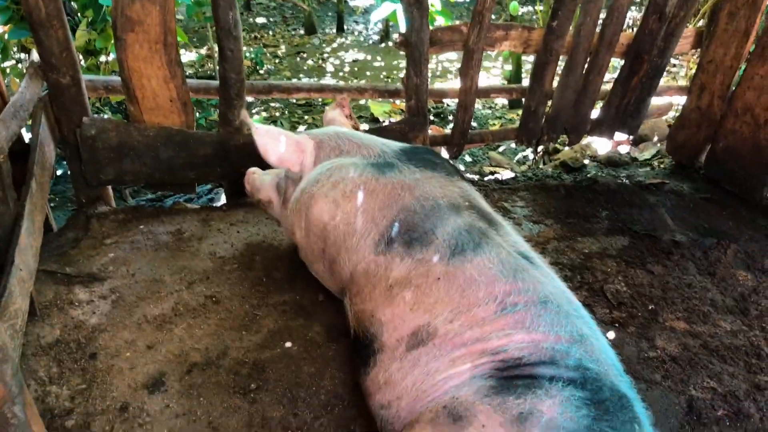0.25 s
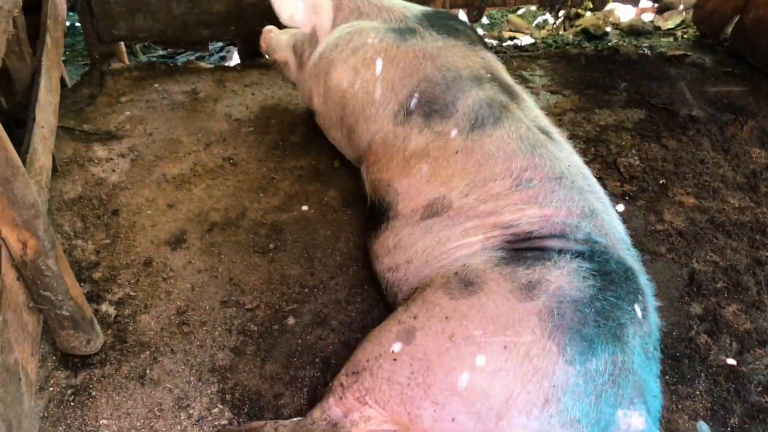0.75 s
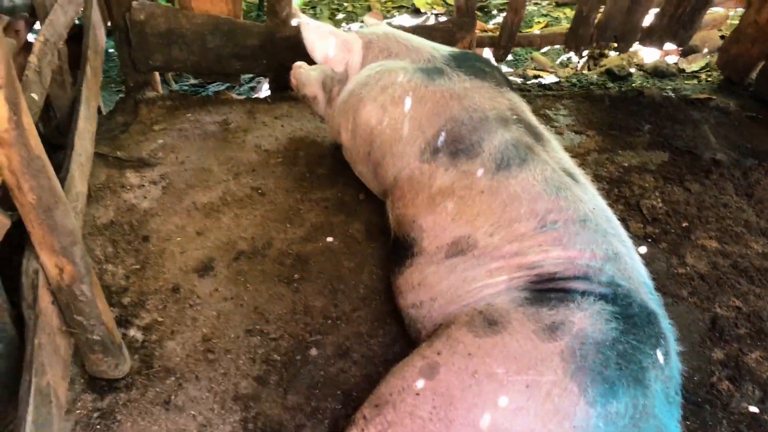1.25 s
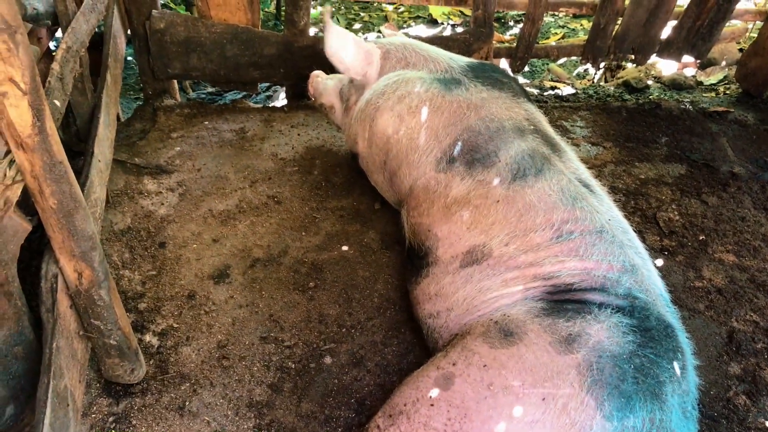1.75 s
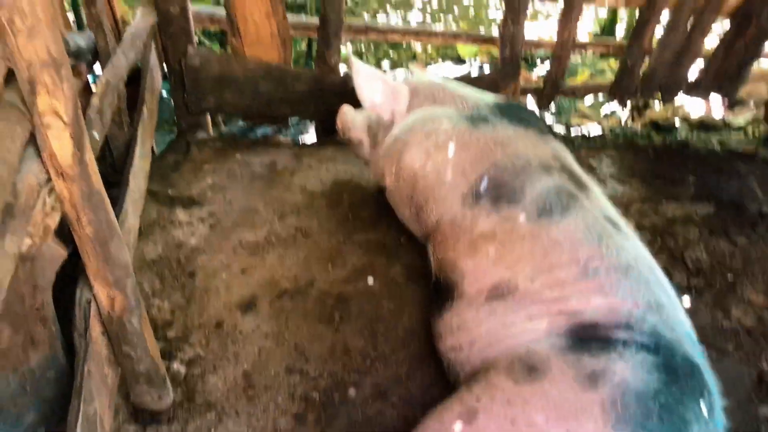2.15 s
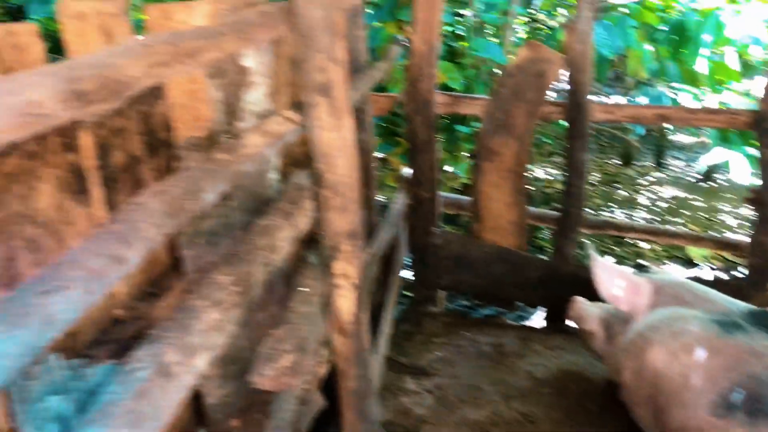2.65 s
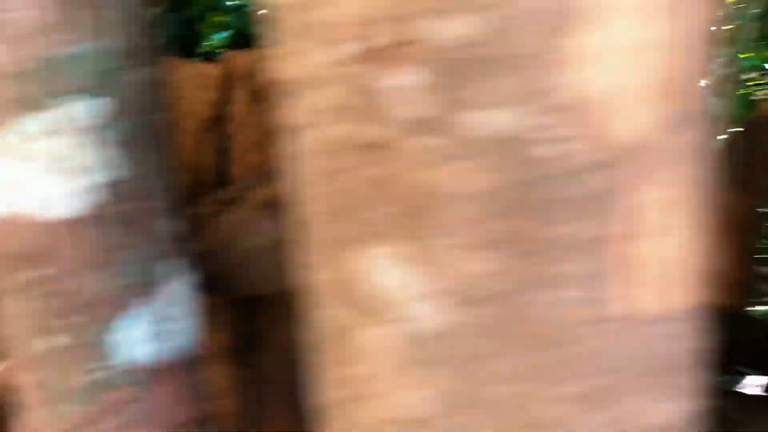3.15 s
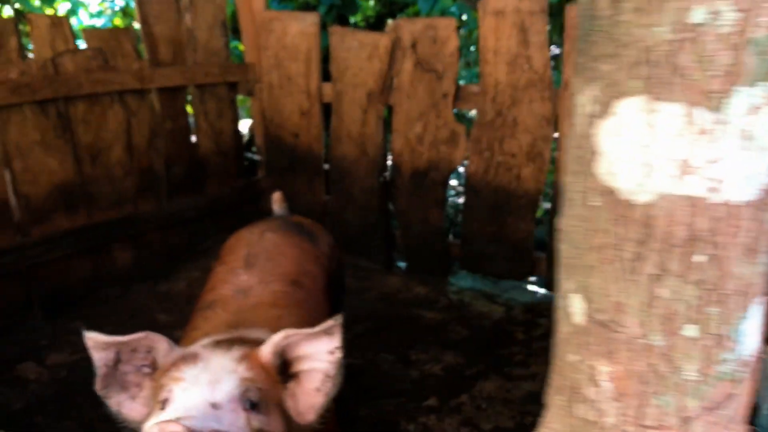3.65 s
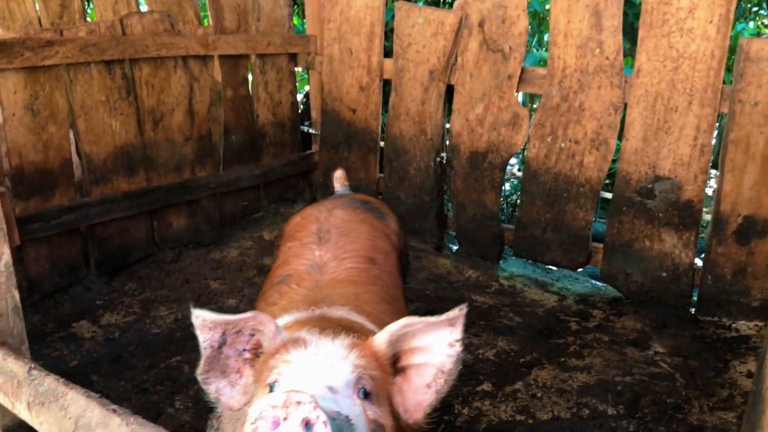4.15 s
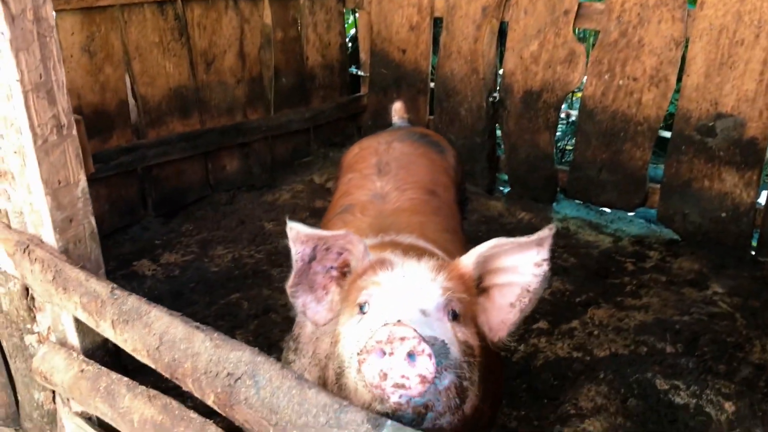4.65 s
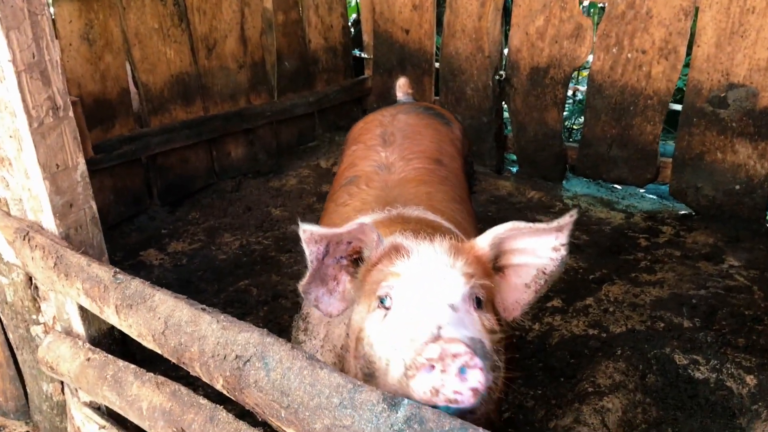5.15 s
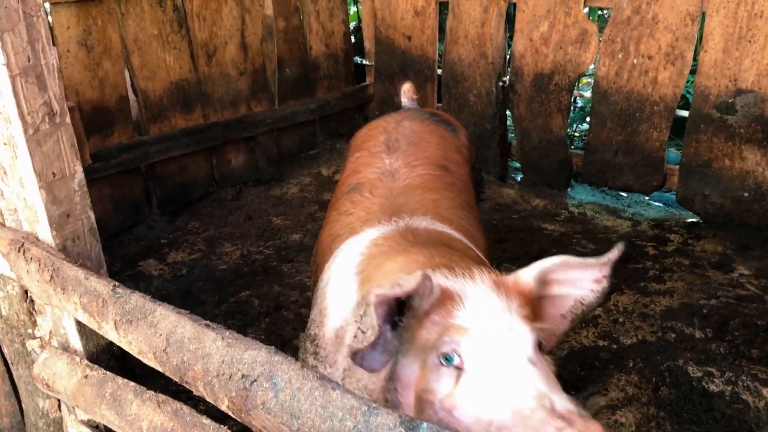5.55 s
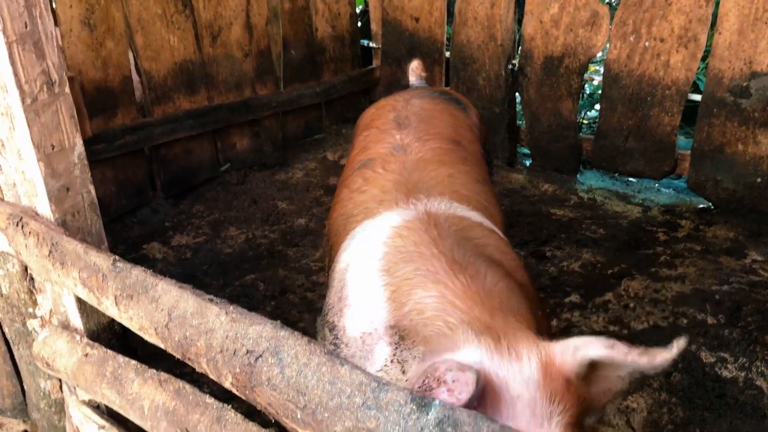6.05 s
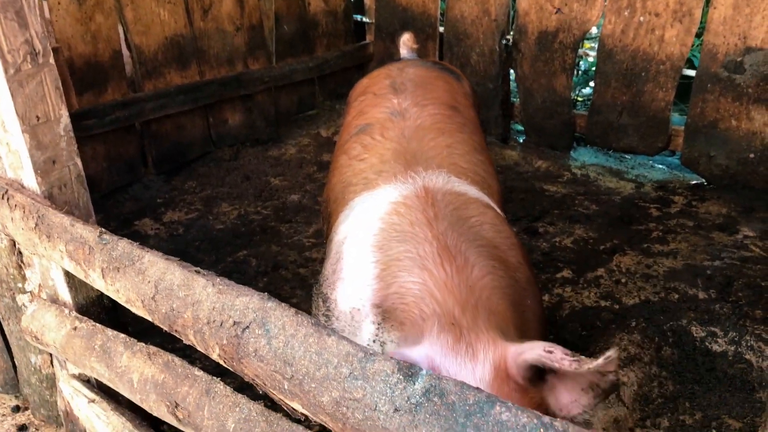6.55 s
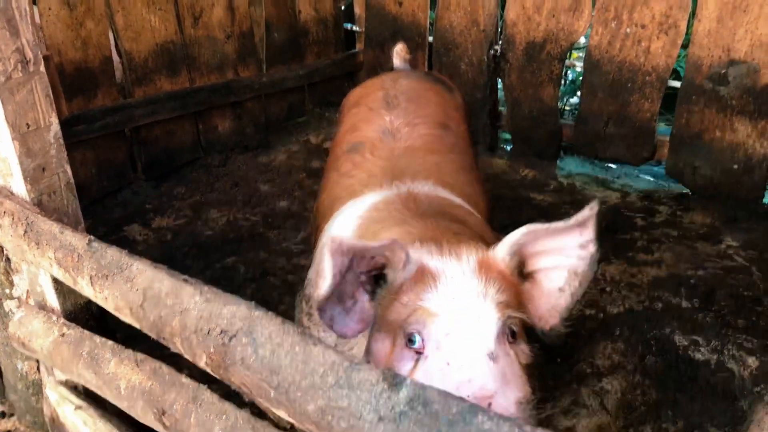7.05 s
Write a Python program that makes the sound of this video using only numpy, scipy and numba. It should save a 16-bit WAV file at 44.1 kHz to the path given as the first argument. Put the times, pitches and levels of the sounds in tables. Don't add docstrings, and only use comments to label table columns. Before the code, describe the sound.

Deep rasping pig grunts with a faint far bird, two hard wooden knocks, wet snorts and smacks, then brighter close grunts outdoors.

```python
import sys
import numpy as np
from scipy import signal
from scipy.fft import rfft, irfft
from scipy.io import wavfile
from scipy.ndimage import uniform_filter1d
from numba import njit

SR = 44100
rng = np.random.default_rng(int(sys.argv[2]) if len(sys.argv) > 2 else 0)


def magnitude_from_level(level_db):
    exponent = np.asarray(level_db, float) / 20
    return 10 ** exponent


def wav_record(signal):
    frames = np.transpose(np.atleast_2d(signal))
    bounded = np.clip(frames, -1, 1)
    quanta = np.round(bounded * 32767).astype(np.int16)
    wavfile.write(sys.argv[1], SR, quanta)


N = 322371


def rms_one(x):
    return x / np.sqrt(np.mean(x ** 2) + 1e-20)


def filtered(x, order, hz, kind="low"):
    return signal.sosfilt(signal.butter(order, hz, kind, fs=SR, output="sos"), x)


def coloured_noise(spectrum):
    hz, level_db = np.transpose(spectrum)
    grid = np.linspace(1, SR / 2, 1025)
    log_level = np.interp(np.log(grid), np.log(hz), level_db) * np.log(10) / 20
    cepstrum = irfft(log_level)
    cepstrum[1:1024] *= 2
    cepstrum[1025:] = 0
    colour = irfft(np.exp(rfft(cepstrum)))
    return rms_one(signal.fftconvolve(rng.standard_normal(N), colour)[:N])


def drift(rate_hz):
    knots = rng.standard_normal(int(N / SR * 60) + 2)
    smooth = signal.lfilter([1], [1, -np.exp(-2 * np.pi * rate_hz / 60)], knots)
    return rms_one(np.interp(np.arange(N) / SR * 60, np.arange(len(knots)), smooth))


def dying(clicks, t60):
    return signal.lfilter([1], [1, -magnitude_from_level(-60 / (t60 * SR))], clicks + 1e-18)


def swells(rows, t, squareness):
    s, rise, fall = np.transpose(rows)[:3, :, None]
    edge_db = 29
    return -edge_db * np.abs((t - s) / np.where(t < s, rise, fall)) ** squareness


@njit
def resonate(x, turn, r):
    y = np.zeros(len(x))
    for i in range(2, len(x)):
        y[i] = (1 - r * r) / 2 * (x[i] - x[i - 2]) + 2 * r * np.cos(turn[i]) * y[i - 1] - r * r * y[i - 2]
    return y


# pitch_hz, level_db (per Hz)
LEAF_COLOUR = [(59, -37), (100, 2), (150, -12), (266, -22), (389, -3), (595, 1.5), (950, -5.5), (1450, -8),
               (3400, -6.5), (4870, -17.5), (5190, -10.5), (6990, -5), (10500, -53), (14400, -11),
               (16000, -25)]
# time_s, level_db
WIND_STRENGTH = [(0.0, -52), (.4, -50), (1.2, -56), (2.2, -54), (3.0, -61), (3.4, -62), (3.7, -54),
                 (4.2, -52), (4.7, -57.5), (5.3, -60), (5.9, -55), (7.31, -55)]
# peak_s, rise_s, fall_s, level_db
FAR_PIGS = [
    (.64, 0.036, 0.08, -51.5),
    (1.45, 0.14, 0.087, -53.5),
    (1.75, 0.1, 0.21, -53.5),
    (3.6, 0.23, 0.27, -55.5),
    (4.1, 0.23, 0.6, -64),
    (4.93, 0.18, 0.094, -49),
    (5.18, 0.1, 0.11, -53),
    (5.93, 0.13, 0.18, -50.5),
]


def outdoors(t):
    leaves = magnitude_from_level(-60.5 + 1.3 * drift(0.56)) * coloured_noise(LEAF_COLOUR)
    wind_s, wind_db = np.transpose(WIND_STRENGTH)
    rumble_db = np.minimum(np.interp(t, wind_s, wind_db), -49)
    rumble = rms_one(filtered(rng.standard_normal(N), 2, [40, 140], "band"))
    rumble = rumble * magnitude_from_level(rumble_db + 2.4 * drift(4.2))
    peaks = magnitude_from_level(np.array(FAR_PIGS)[:, 3])
    far_gain = np.interp(t, t[::64], peaks @ magnitude_from_level(swells(FAR_PIGS, t[::64], 2)))
    murmur = rms_one(filtered(rng.standard_normal(N), 2, [170, 320], "band"))
    murmur = murmur * (far_gain + magnitude_from_level(-68)) * magnitude_from_level(2.4 * drift(9.8))
    return leaves + rumble + murmur


# start_s, length_s, start_hz, end_hz, level_db
BIRD_CHIRPS = [(0, 0.1, 4150, 4000, -75), (0.05, 0.081, 3400, 3190, -72.5), (.51, 0.14, 3050, 2994, -73),
               (.63, 0.25, 2900, 2780, -67), (1.065, 0.066, 3250, 2950, -73),
               (2.07, 0.049, 4300, 3900, -69), (1.12, 0.06, 2620, 2400, -69.5),
               (1.308, 0.083, 2750, 2500, -65.5), (1.88, 0.04, 2450, 2350, -72),
               (1.946, 0.03, 4080, 4020, -74), (1.965, 0.035, 3370, 3290, -64),
               (2.048, 0.03, 2680, 2700, -69), (2.168, 0.083, 3600, 3250, -72),
               (2.314, 0.081, 3600, 3380, -69), (2.468, 0.068, 3600, 3370, -75),
               (2.97, 0.11, 3300, 3126, -68.5), (3.118, 0.036, 2800, 2750, -68.5),
               (3.143, 0.08, 3730, 3340, -69.5), (3.29, 0.059, 3700, 3300, -65),
               (3.43, 0.021, 4420, 4350, -69), (5.27, 0.17, 3300, 3110, -74)]
# start_s, length_s, start_hz, end_hz, level_db
NOSE_WHINES = [
    (.635, 0.034, 960, 950, -65),
    (.64, 0.046, 1960, 1700, -71),
    (6.187, 0.037, 1400, 1380, -49.5),
    (2.322, 0.038, 650, 680, -56),
]


def whistles():
    out = np.zeros(N)
    husk = rms_one(signal.lfilter([1], [1, -.985], rng.standard_normal(N)))
    for s, length, start_hz, end_hz, level_db in BIRD_CHIRPS + NOSE_WHINES:
        u = np.linspace(0, 1, round(length * SR))
        hz = end_hz + (start_hz - end_hz) * (1 - u) ** 2
        hz = hz + 40 * np.sin(2 * np.pi * 90 * u * length)
        swell = np.sqrt(np.sin(np.pi * u) + 1e-9)
        whistle = swell * np.sin(2 * np.pi * np.cumsum(hz) / SR)
        out[round(max(s, 0) * SR):][:len(u)] += magnitude_from_level(level_db + 5.5) * whistle
    return out * magnitude_from_level(5.5) * (1 + 0.65 * husk)


# peak_s, rise_s, fall_s, level_db
STRAW_SCUFFS = [
    (3.595, .08, 0.078, -55),
    (6.36, .05, .1, -62),
    (5.05, .1, .1, -60),
]


def straw(t):
    gain = magnitude_from_level(np.array(STRAW_SCUFFS)[:, 3]) @ magnitude_from_level(swells(STRAW_SCUFFS, t, 3))
    return gain * rms_one(filtered(rng.standard_normal(N), 2, 10000, "high"))


# start_s, peak_db, pitch_hz
SMACKS = [(0.4304, -55, 2950), (3.4411, -53, 4400), (3.8165, -56, 14500), (3.872, -43.5, 8840),
          (4.1587, -44, 6300), (4.446, -50, 13200), (4.4965, -41, 4510), (4.572, -34, 3190),
          (4.8442, -33.5, 3400), (5.0805, -40, 6800), (5.564, -31, 3160), (4.52, -25, 2900),
          (3.617, -48, 1200), (5.793, -52, 3100), (6.373, -36, 3500)]
# start_s, peak_db, pitch_hz, t60_s
WET_PUFFS = [
    (5.382, -44, 2500, .06),
    (5.463, -48, 4300, .05),
    (5.5, -52, 4500, .04),
    (6.63, -35.5, 3900, .04),
    (7.29, -42, 2100, .05),
]


def smacks_and_puffs():
    out, t = np.zeros(N), np.arange(600) / SR
    for s, peak_db, hz in SMACKS:
        noise = rng.standard_normal(600) * magnitude_from_level(-60 * t / 0.008)
        tick = resonate(noise, 2 * np.pi * hz / SR + 0 * t, 0.57)
        out[round(s * SR):][:600] += magnitude_from_level(peak_db + 5.5) * tick / np.abs(tick).max()
    for s, peak_db, hz, t60 in WET_PUFFS:
        noise = rng.standard_normal(600) * magnitude_from_level(-60 * t / t60) * np.hanning(600) ** .3
        puff = resonate(noise, 2 * np.pi * hz / SR + 0 * t, 0.92)
        out[round(s * SR):][:600] += magnitude_from_level(peak_db) * puff / np.abs(puff).max()
    return out


# start_s, crack_db, wood_db, wood_pitch_hz, upper_modes_db
PLANK_BLOWS = [
    (2.7719, -37, -24.5, 383, -15),
    (2.7804, -8, -14, 355.7, -0.5),
    (3.616, -44, -46, 280, 3),
    (3.7393, -64, -37, 341.4, -5),
    (3.9504, 3.5, -15, 336.5, -10.5),
    (4.5192, -19.5, -55, 430, -29),
]
# pitch_ratio, level_db, t60_s
PLANK_MODES = [(1.04, -6, 0.33), (0.974, 11, 0.089), (0.53, -22, 0.045), (1.56, -13, 0.027),
               (1.48, 1, 0.14), (2.28, -7, 0.052), (3, -12.5, 0.13), (3.7, -1, 0.042)]
# pitch_hz, level_db (per Hz)
CRACK_COLOUR = [(350, -61), (600, 6.5), (1450, -23), (1970, -6.5), (3700, 2), (5160, -11.5), (6360, -4.5),
                (7730, -10), (12800, -11.5), (15100, -7), (16200, -18), (16900, -67)]
# pitch_hz, level_db (per Hz)
RATTLE_COLOUR = [(300, -19), (700, -6.5), (2000, -4), (3500, -1.5), (6000, -6), (10000, 0.5), (15000, -4.5),
                 (16900, -58)]


def knocks():
    wood, t = np.zeros(N), np.arange(SR // 2) / SR
    cracks = np.zeros((2, N))
    onset = np.minimum(t / 0.00062, 1)
    for s, crack_db, wood_db, wood_hz, upper_db in PLANK_BLOWS:
        at = round(s * SR)
        fleshy_blow = int(crack_db - wood_db < 12)
        cracks[fleshy_blow, at] = magnitude_from_level(crack_db)
        for ratio, level_db, t60 in PLANK_MODES:
            upper = t60 > .04 and ratio > 1.2
            mode_db = wood_db + level_db + upper_db * upper - 8 - 60 * t / t60
            wood[at:at + len(t)] += magnitude_from_level(mode_db) * np.sin(2 * np.pi * wood_hz * ratio * t) * onset
    wood = filtered(wood, 2, 220, "high")
    burst = signal.fftconvolve(cracks, np.hanning(round(0.0042 * SR))[None])[:, :N]
    tail = magnitude_from_level(-11.5) * dying(cracks, t60=0.035) + magnitude_from_level(-21.5) * dying(cracks, t60=0.18)
    hard, fleshy = (magnitude_from_level(-7.5) * burst * coloured_noise(CRACK_COLOUR)
                    + magnitude_from_level(-12) * tail * coloured_noise(RATTLE_COLOUR))
    return wood + hard + filtered(fleshy, 2, 10500)


# peak_s, rise_s, fall_s, hiss_db, puff_db
SOFT_SNIFFS = [(.256, 0.22, 1, -69.5, -65.5), (1.04, 0.23, 0.065, -62, -66), (1.82, 0.1, 0.13, -63, -64),
               (2.42, 0.094, 0.23, -64.5, -66), (2.92, 0.35, 0.19, -71, -57),
               (4.859, 0.03, 0.076, -55, -49.5), (5.2, .06, 0.11, -69, -68), (5.68, 0.34, 0.13, -56.5, -51),
               (5.95, 0.1, 0.085, -66, -69), (6.15, 0.12, 0.13, -57, -54), (6.41, 0.14, 0.22, -59, -51.5),
               (6.7, 0.17, 0.15, -60, -64), (7.18, 0.043, 0.091, -67, -65)]
# peak_s, rise_s, fall_s, hiss_db, puff_db
SNORTS = [
    (1.44, 0.11, 0.16, -58, -49.5),
    (3.36, 0.17, 0.21, -67, -65),
    (3.614, 0.069, .07, -65, -54),
    (4.15, 0.29, 0.19, -64.5, -63),
    (4.55, 0.093, 0.12, -49.5, -53.5),
    (5.05, 0.21, .12, -55, -57),
    (6.88, 0.11, 0.13, -48.5, -46),
]
# pitch_hz, level_db (per Hz)
HISS_COLOUR = [(880, -38), (1500, -7.5), (2210, -5.5), (3350, -1.5), (6560, -5), (7610, -10.5), (8570, -7),
               (10600, -11.5), (14900, -5.5), (16000, -29)]
# pitch_hz, level_db (per Hz)
PUFF_COLOUR = [(180, -55), (300, 1.5), (404, -4), (441, 1), (764, 1), (1390, -5), (3000, -26), (3900, -37),
               (6600, -120)]


def sniffs(t):
    rows = np.array(SOFT_SNIFFS + SNORTS)
    coarse_t = t[::64]
    shape = magnitude_from_level(np.vstack([swells(SOFT_SNIFFS, coarse_t, 2), swells(SNORTS, coarse_t, 3.5)]))
    hiss_gain = np.interp(t, coarse_t, magnitude_from_level(rows[:, 3]) @ shape) + magnitude_from_level(-69.5)
    puff_gain = np.interp(t, coarse_t, magnitude_from_level(rows[:, 4]) @ shape) + magnitude_from_level(-65.5)
    hiss = coloured_noise(HISS_COLOUR) * hiss_gain * magnitude_from_level(3.5 + 1.73 * drift(46))
    return hiss + coloured_noise(PUFF_COLOUR) * puff_gain * magnitude_from_level(2.2 * drift(45))


def pen(x):
    lag = np.arange(SR // 4) / SR
    scatter = rng.standard_normal(len(lag)) * magnitude_from_level(-60 * lag / .2) * (lag > .004)
    scatter = signal.lfilter([.5], [1, -.5], scatter)
    return x + magnitude_from_level(-12) * signal.fftconvolve(x, scatter / np.linalg.norm(scatter))[:N]


LEAD_S, TAIL_S = .07, .12


def clap_times(start, gaps, first_ms, settled_ms):
    k = np.arange(gaps)
    gap_ms = settled_ms + (first_ms - settled_ms) * .6 ** k + .25 * k
    return start + np.append(0, np.cumsum(gap_ms)) / 1000


def effort_db(t, times, effort):
    peak, chest_db, snout_db, swell, fade = effort
    before = swell * np.maximum(peak - t, 0)
    after = fade * np.maximum(t - peak, 0)
    ends = 302 * np.maximum(times[0] - t, 0) + 23 * np.maximum(t - times[-1], 0)
    ends = ends + 30 * np.clip(1 - (times[-1] + TAIL_S - t) / .015, 0, 1)
    return chest_db - 0.74 * before - 0.46 * after - ends, snout_db - before - after - ends


def vocal_folds(t, times, claps, rasp, voiced):
    slap_noise, air_noise = rng.standard_normal((2, len(t)))
    slap = rms_one(dying(claps, t60=0.023) * slap_noise)
    air = rms_one((dying(claps, t60=.06) + .25) * air_noise)
    beat = uniform_filter1d(np.interp(t, times, np.arange(len(times))), SR // 40)
    beat = beat + np.interp(t, times, rng.normal(0, .025, len(times)))
    hum = np.zeros(len(t))
    for k in range(1, 20):
        hum += (1 - 0.63 * (k % 2)) * np.sin(2 * np.pi * (k * beat + rng.random()))
    hum = hum * np.sqrt(2 * np.mean(np.diff(times))) * (t > times[0])
    pulses = rms_one(claps)
    chest = (1 - voiced) * pulses + 0.53 * voiced * hum + 1.34 * rasp * (1 - voiced) * air
    snout = (1 - rasp) * (0.46 * pulses + slap) * (1 - .5 * voiced) + rasp * air + 0.21 * voiced * hum
    return chest, snout


# pitch_hz, width_hz, level_db
BIG_PIG_THROATS = [
    [(195, 59, 0), (449.7, 58, -4.5), (913, 76, -11.5), (1680, 120, -7.5), (2790, 98, -20),
     (3300, 120, -14), (4100, 66, -20), (4400, 60, -22), (1910, 270, -14.5), (5420, 360, -24),
     (640, 150, -8), (1280, 250, -11)],
    [(80, 23, 1), (236, 33, 11), (656, 140, -13.5), (1136, 73, -6.5), (2100, 45, -13.5), (2840, 61, -12.5),
     (3250, 23, -18.5), (4150, 45, -34), (4470, 39, -27), (1620, 590, -17), (2500, 500, -16),
     (480, 120, -10)],
    [(80.6, 25, 1.5), (222.7, 30, 8), (420, 95, -4.5), (579, 19, -1.5), (730, 49, -7), (1095, 82, -6.5),
     (1880, 60, -8.5), (2885, 110, -12.5), (3960, 90, -24), (4550, 90, -26), (2400, 900, -27),
     (3500, 200, -31)],
    [(208, 41, 6), (378, 124, 1), (513, 130, -6), (874, 56, -5), (1850, 230, -18)],
]
# pitch_hz, width_hz, level_db
YOUNG_PIG_THROATS = [
    [(200, 28, -2), (686, 26, 9), (1273, 89, -6.5), (2020, 175, -8), (3020, 71, -5), (3700, 33, -16),
     (3900, 57, -18), (4530, 99, -10.5), (6050, 180, -21.5)],
    [(169, 44, 0), (576, 69, 2), (1470, 280, -7.5), (1970, 53, -5.5), (3050, 350, -9), (3540, 100, -5),
     (4150, 350, -9), (4570, 99, -12.5), (5860, 190, -20)],
    [(194, 27, -4), (620, 30, 12), (1400, 41, -8.5), (1610, 26, -7.5), (2450, 47, -13), (2800, 240, -12),
     (3580, 106, -3.5), (5250, 79, -23)],
    [(175, 25, 0), (583, 40, 14), (1112, 190, 5), (1650, 41, 8), (1780, 25, -4), (2860, 190, 2),
     (3560, 85, 5.5), (4000, 170, -2.5), (4020, 33, 7.5), (7160, 700, -11), (9100, 570, -17)],
    [(179, 28, 0), (594, 35, 15), (1120, 150, 8.5), (1500, 140, 5.5), (1907, 60, 2.5), (2900, 130, 4.5),
     (3600, 220, 3), (4300, 180, 0.5), (7140, 580, -15.5)],
]
# pitch_hz, width_hz
SIDE_CAVITIES = [
    [],
    [(3900, 400)],
    [(1450, 230)],
    [],
    [(3850, 190)],
    [(2330, 310), (5000, 400)],
    [(1950, 250), (4400, 430)],
    [(2100, 450), (4850, 300)],
    [(2250, 310), (4950, 300)],
]


def throat(t, claps, sources, shape, rise, voiced, mouth_hz):
    chest_top_hz = 450
    chest_source, snout_source = sources
    chest, snout = np.zeros((2, len(t)))
    opening = dying(claps, t60=0.028)
    stretch = rise * np.tanh(2.4 * np.linspace(-1, 1, len(t))) / 2
    for k, (hz, width, level_db) in enumerate((BIG_PIG_THROATS + YOUNG_PIG_THROATS)[shape]):
        wobble = np.interp(t, np.linspace(t[0], t[-1], 12), rng.normal(0, 0.039, 12))
        wobble = wobble * (hz > chest_top_hz) * (1 - voiced)
        mouth_share = 0.25 + .8 * np.exp(-(np.log(hz / mouth_hz) / .4) ** 2)
        dip = (0.035 + 0.067 * (hz > 3200)) * (1 - voiced) * opening
        glide = 1 + stretch * mouth_share + wobble - dip
        source, part = (chest_source, chest) if hz < chest_top_hz else (snout_source, snout)
        r = np.exp(-np.pi * max(width, 20, 0.037 * hz) / SR)
        part += (-1) ** k * magnitude_from_level(level_db) * resonate(source, 2 * np.pi * hz * glide / SR, r)
    snout = filtered(snout, 4, 8500)
    for hz, width in SIDE_CAVITIES[shape]:
        turn = 2 * np.pi * hz * (1 + stretch / 2) / SR
        snout = snout - .9 * resonate(snout, turn, np.exp(-np.pi * width / SR))
    return rms_one(filtered(chest, 2, 1500)), rms_one(snout)


def grunt(beat, effort, manner):
    shape, rasp, rise, voiced, mouth_hz = manner
    rasp, voiced = np.clip([rasp, voiced], 0, 1)
    times = clap_times(*beat)
    first = round((times[0] - LEAD_S) * SR)
    last = min(round((times[-1] + TAIL_S) * SR), N)
    t = np.arange(first, last) / SR
    claps = np.zeros(len(t))
    claps[(times * SR).astype(int) - first] = magnitude_from_level(rng.normal(0, .7, len(times)))
    sources = vocal_folds(t, times, claps, rasp, voiced)
    chest, snout = throat(t, claps, sources, round(shape), rise, voiced, mouth_hz)
    belly = rms_one(resonate(claps, 2 * np.pi * 58 / SR + 0 * t, np.exp(-np.pi * 30 / SR)))
    chest_db, snout_db = effort_db(t, times, effort)
    snout_db = snout_db - 27 * voiced ** 4 * (t < times[1] - .002)
    out = np.zeros(N)
    out[first:last] = magnitude_from_level(chest_db) * (chest + magnitude_from_level(-12) * (1 - voiced) * belly) + magnitude_from_level(snout_db) * snout
    return out


# first_clap_s, gaps (count), first_gap_ms, settled_gap_ms
GRUNT_BEATS = [(.224, 3, 24, 23.5), (.690, 7, 28.5, 22.5), (1.659, 4, 37, 22), (2.322, 17, 31, 22.3),
               (2.876, 4, 25.5, 25), (4.657, 6, 24, 23.5), (4.845, 7, 22, 21.5), (5.472, 1, 29, 29),
               (5.530, 4, 33, 23.3), (6.082, 3, 31, 22.8), (6.358, 2, 16.5, 23), (6.4215, 1, 3, 3),
               (6.619, 4, 38, 17), (7.254, 1, 48, 48), (6.752, 2, 17, 40), (4.745, 1, 5, 5),
               (5.648, 2, 24, 24), (6.047, 1, 16, 16), (6.446, 1, 4, 4)]
# peak_s, chest_db, snout_db, swell_db_per_s, fade_db_per_s
GRUNT_EFFORT = [(0.253, -37, -39.5, 120, 239), (.75, -30.5, -35, 121, 92), (1.736, -48, -45.5, 143, 230),
                (2.42, -31, -40, 67, 23), (2.922, -40.5, -46.5, 184, 256), (4.745, -39, -46, 136, 252),
                (4.86, -51, -58, 43, 82), (5.5, -48.5, -76, 100, 30), (5.584, -27, -21, 288, 308),
                (6.15, -33, -30, 168, 51), (6.397, -33.5, -32, 218, 400), (6.422, -36, -26.5, 98, 250),
                (6.716, -32.5, -30, 147, 62), (7.3, -48.5, -50, 153, 30), (6.78, -34, -28, 33, 65),
                (4.748, -60, -51, 200, 400), (5.655, -37.5, -43, 300, 200), (6.05, -50.5, -67, 300, 298),
                (6.449, -48, -33.5, 300, 150)]
# throat (number), rasp (0-1), resonance_rise (share), steady_voicing (0-1),
# most_moving_hz
GRUNT_MANNER = [(0, 0.71, 0.17, 0.53, 1800), (1, 1, -0.069, 0.55, 950), (0, 1, -0.07, 0.06, 1000),
                (2, 0.6, -0.28, 0.77, 1740), (0, 0.6, -0.31, 0.33, 900), (3, 0.94, -0.27, 0.14, 510),
                (3, 0, 0.099, 0, 600), (4, 0, .01, 0.94, 700), (4, 0.27, 0.13, 0.12, 700),
                (5, 0.38, -0.16, 0.08, 830), (6, 0.15, -0.033, 0.25, 700), (6, 0.42, 0.078, 0.07, 640),
                (7, 0.4, 0.08, 0, 1100), (7, 0.26, -0.026, 0.2, 1000), (8, 0.57, .15, 0.23, 1300),
                (0, 0.74, -0.098, 0.2, 1300), (4, .5, -0.11, 0.62, 700), (5, 0.2, .02, 0.3, 600),
                (6, 0.72, 0.038, .05, 700)]


def grunts():
    return sum(grunt(*row) for row in zip(GRUNT_BEATS, GRUNT_EFFORT, GRUNT_MANNER))


def scene():
    t = np.arange(N) / SR
    inside_pen = pen(magnitude_from_level(-1.5) * grunts() + whistles() + knocks())
    return (inside_pen + smacks_and_puffs() + sniffs(t) + outdoors(t) + straw(t))[None]


def low_pass(x):
    return signal.sosfilt(signal.butter(12, 17060, fs=SR, output="sos"), x)


def record(dry):
    rounded = .85 * np.tanh(dry / .85)
    mix = signal.sosfilt(signal.cheby2(10, 60, 17600, fs=SR, output="sos"), rounded)
    mix = filtered(mix, 2, 36, "high")
    hiss = signal.sosfilt(signal.cheby2(10, 50, 16400, fs=SR, output="sos"), rng.standard_normal(N))
    return low_pass(mix + magnitude_from_level(-70) * hiss)


dry = scene()
out = record(dry)
wav_record(out)
```